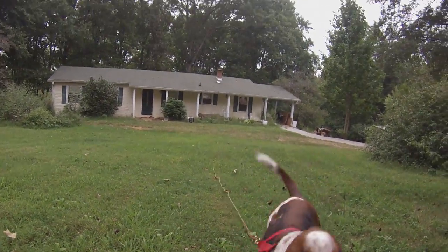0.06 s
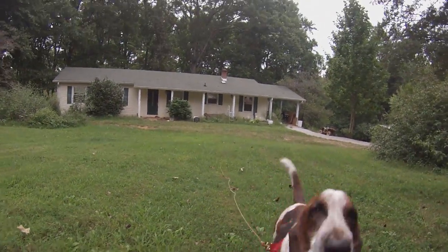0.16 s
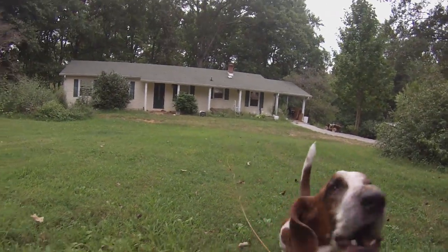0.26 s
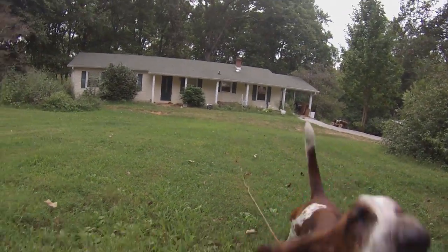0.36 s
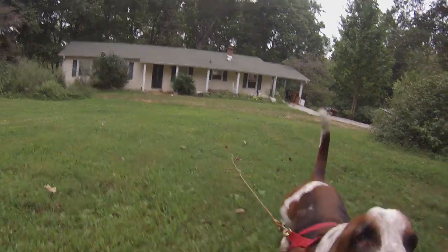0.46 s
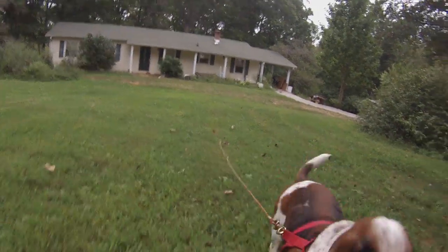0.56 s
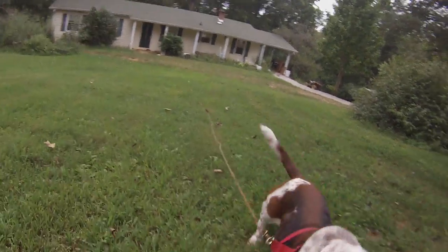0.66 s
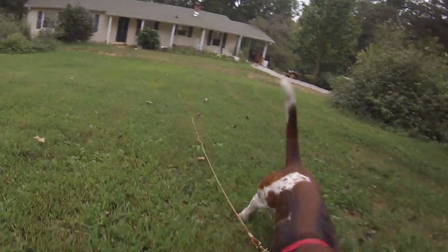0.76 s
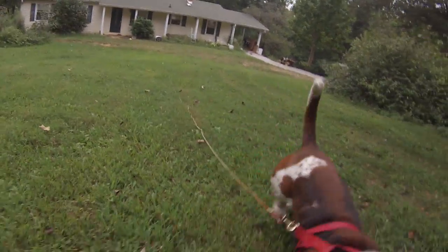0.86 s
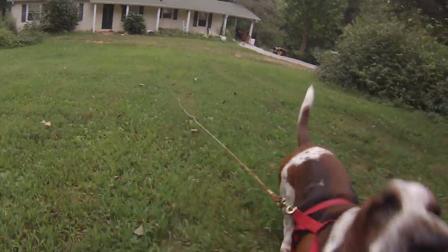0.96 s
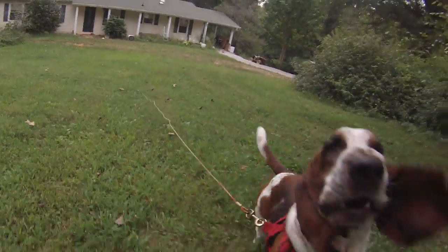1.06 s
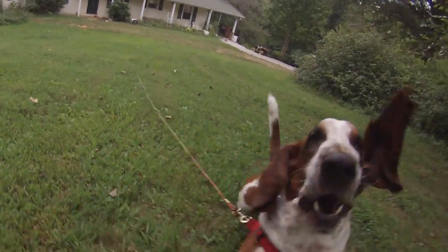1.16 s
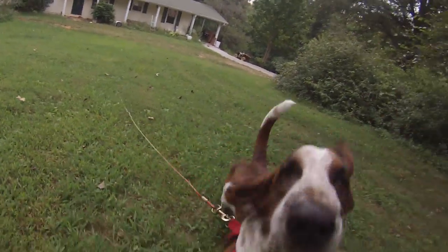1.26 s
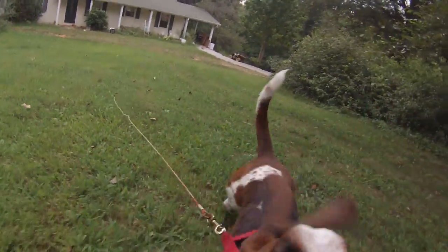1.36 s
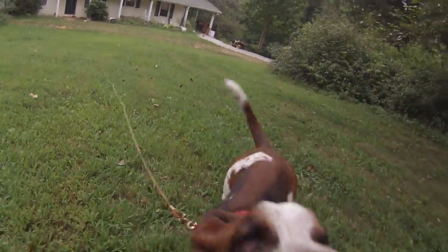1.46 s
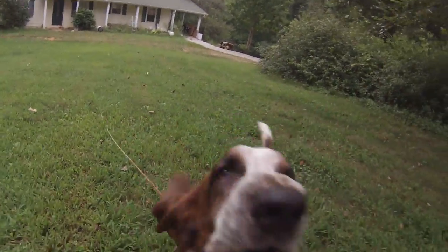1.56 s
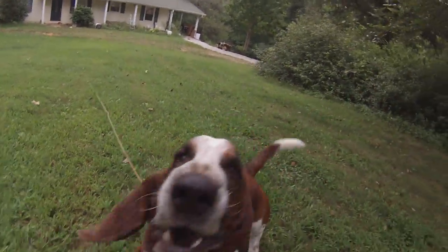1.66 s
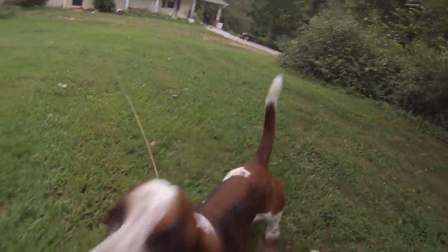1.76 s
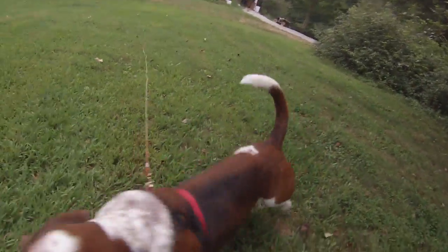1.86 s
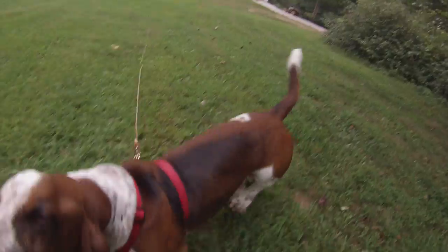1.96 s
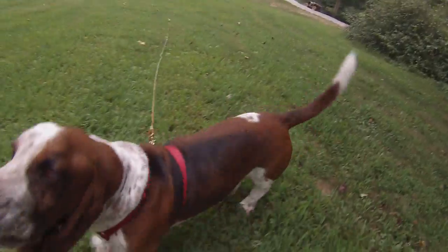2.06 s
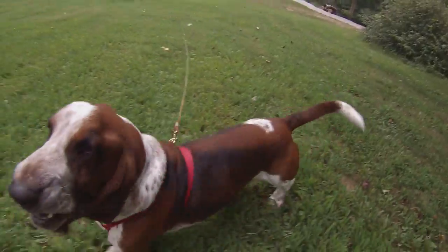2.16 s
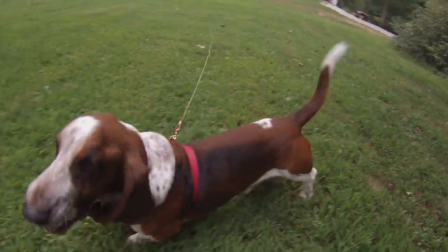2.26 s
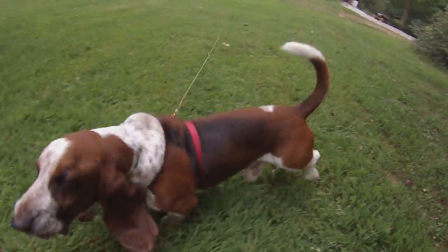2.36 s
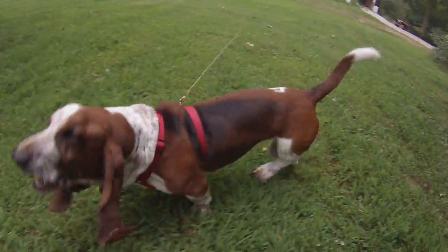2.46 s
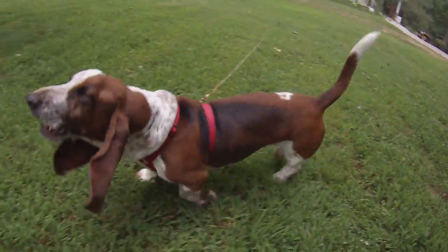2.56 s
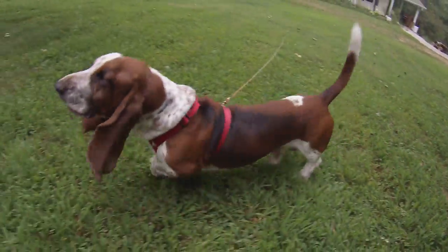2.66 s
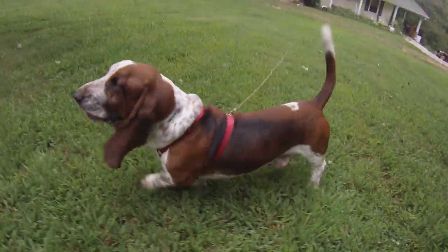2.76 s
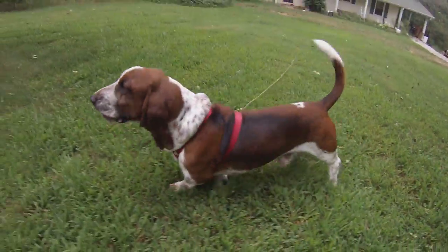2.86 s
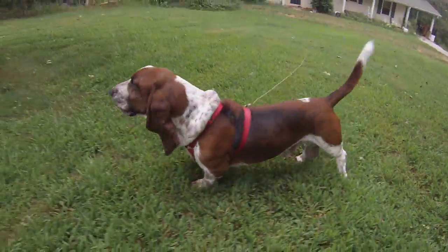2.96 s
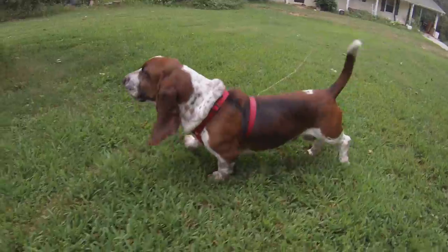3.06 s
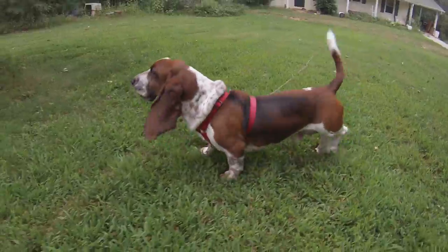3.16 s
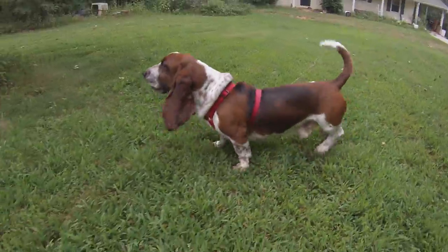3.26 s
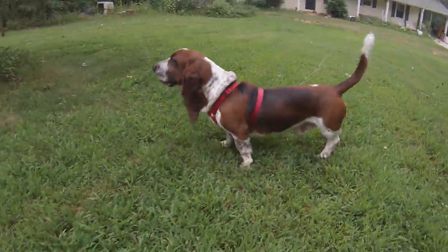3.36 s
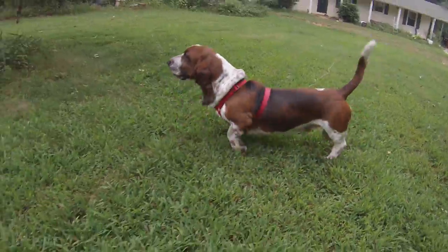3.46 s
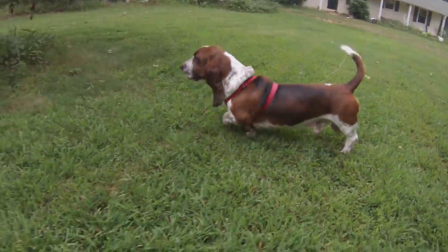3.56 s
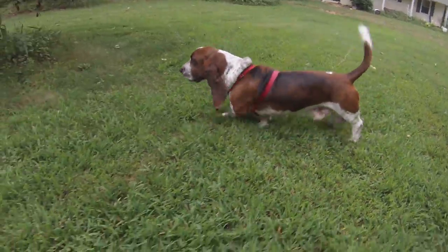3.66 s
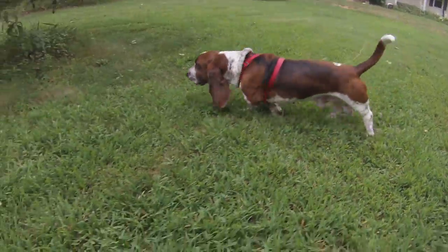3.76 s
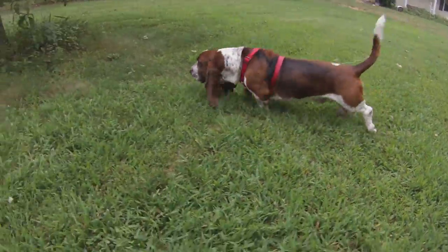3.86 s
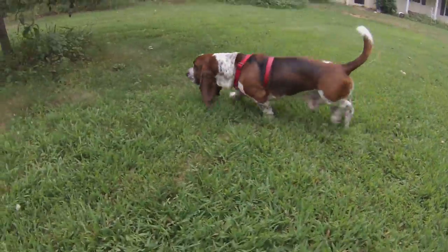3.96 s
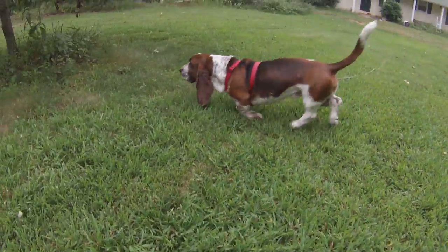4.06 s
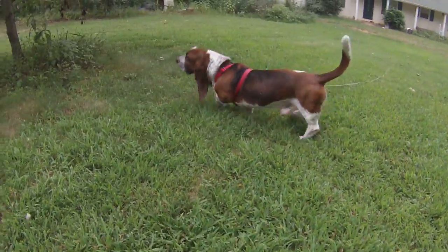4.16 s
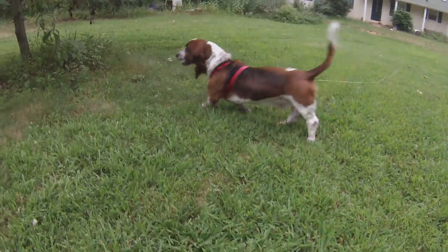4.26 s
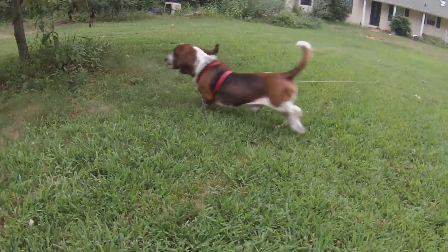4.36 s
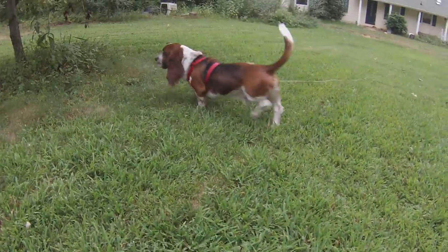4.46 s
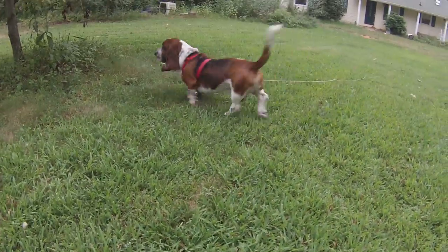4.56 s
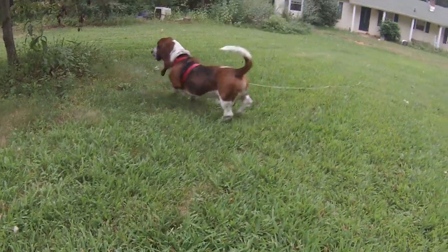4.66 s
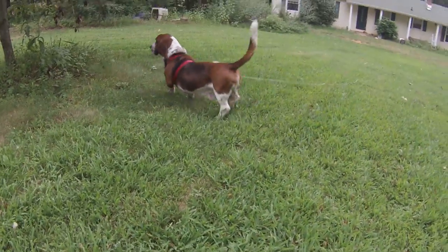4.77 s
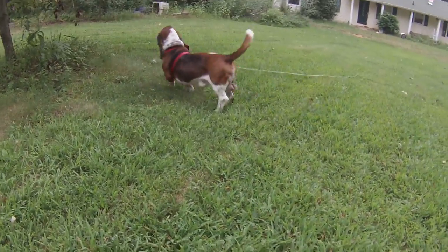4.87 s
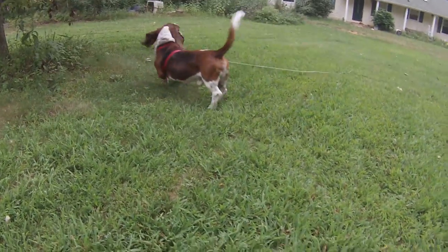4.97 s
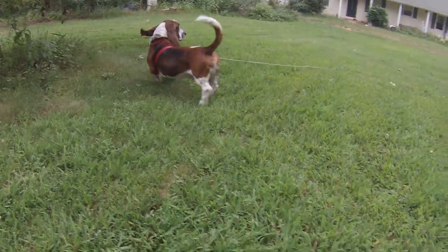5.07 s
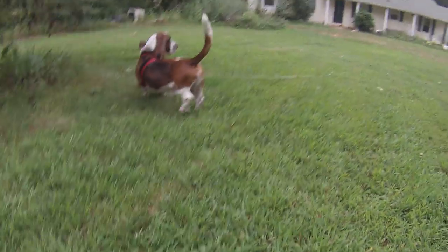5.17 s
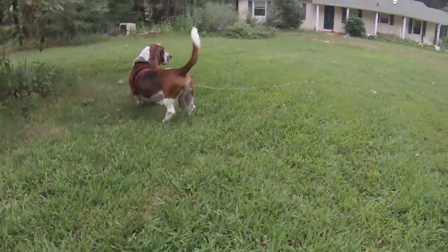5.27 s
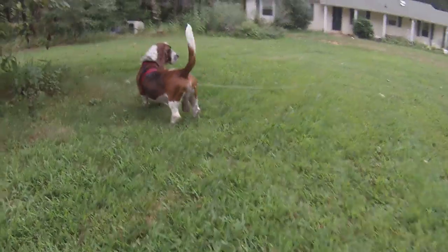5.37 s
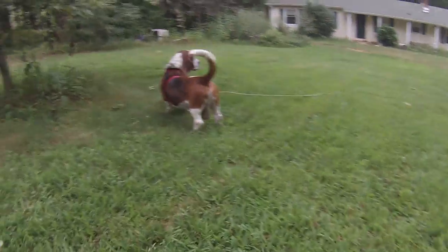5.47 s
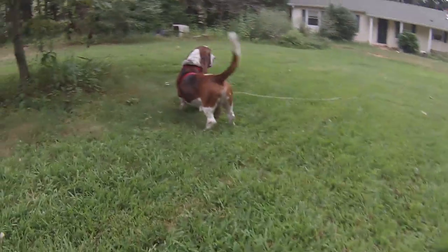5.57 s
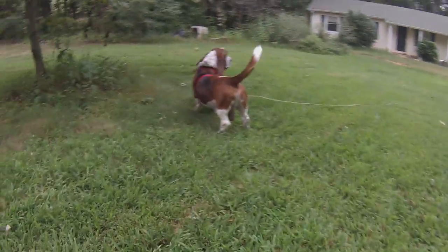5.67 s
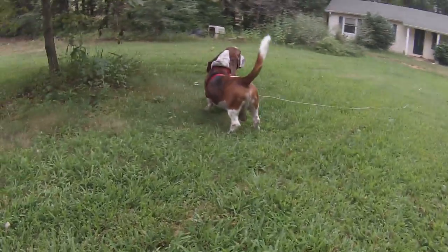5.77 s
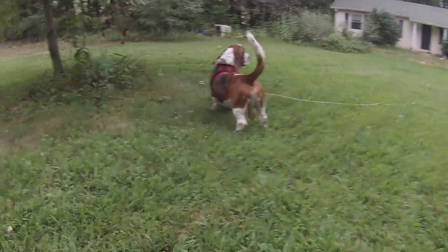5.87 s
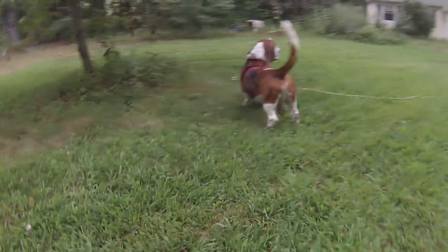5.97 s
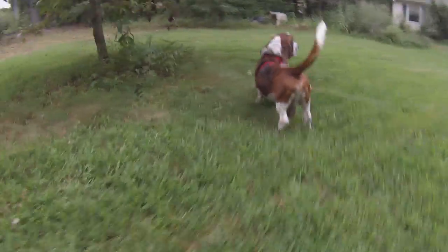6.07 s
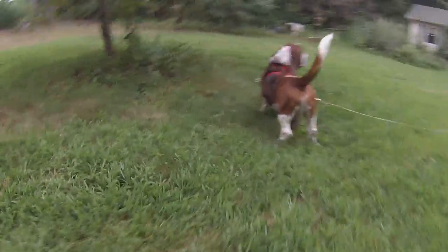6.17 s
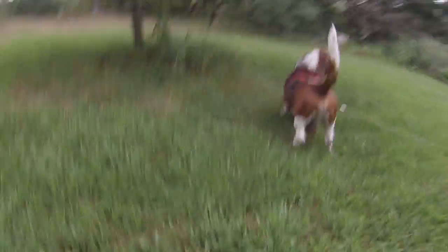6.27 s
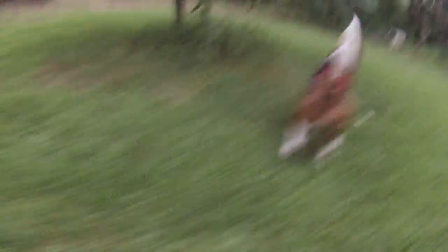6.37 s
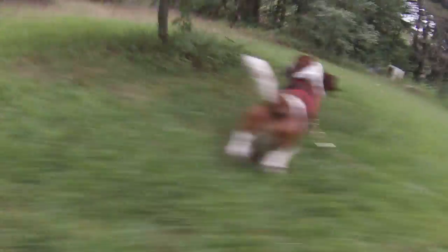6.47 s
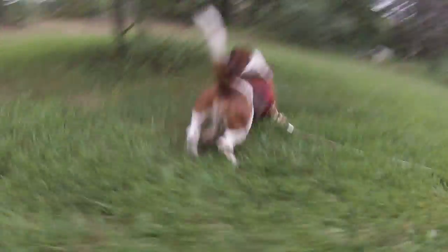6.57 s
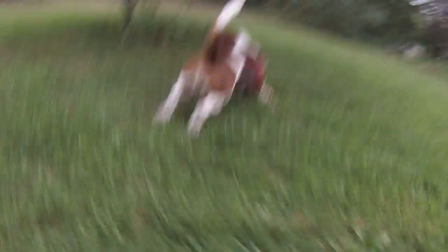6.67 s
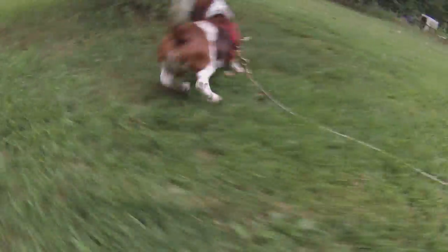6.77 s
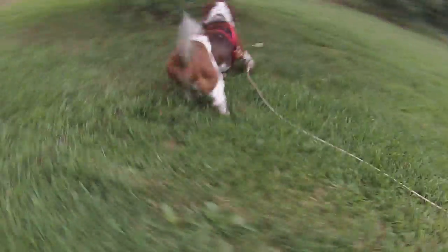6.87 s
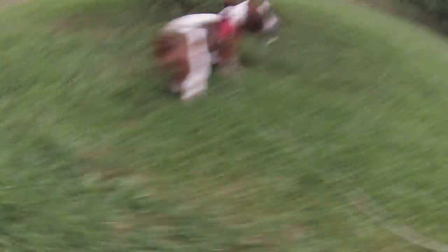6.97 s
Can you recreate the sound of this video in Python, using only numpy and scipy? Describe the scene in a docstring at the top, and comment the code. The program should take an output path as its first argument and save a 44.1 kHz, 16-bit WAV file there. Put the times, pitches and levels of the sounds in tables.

```python
"""On a lawn, a hound barks five times close to a small hand-held camera; a house front answers faintly.
Each bark is a train of pulses from the vocal folds that rings in the dog's head and turns hoarse midway.
The camera case is knocked, creaks and rubs in the hand, and moving air buffets the microphone,
mostly near the end. Behind it all are a distant hush and a faint, fluttering high hiss."""
import sys
import numpy as np
from scipy import signal
from scipy.fft import rfft, irfft, next_fast_len
from scipy.io import wavfile
from scipy.ndimage import uniform_filter1d, map_coordinates

SR = 44100
rng = np.random.default_rng(int(sys.argv[2]) if len(sys.argv) > 2 else 0)


def dump_mix(stems):
    """Bounce the given channels to the path in sys.argv[1] as a 16-bit WAV at rate SR."""
    frames = np.atleast_2d(stems).T  # one column per channel
    limited = np.clip(frames, -1, 1)  # hard clip at full scale
    pcm = np.round(limited * 32767).astype(np.int16)
    wavfile.write(sys.argv[1], SR, pcm)


N = 310023

# The course of each bark, one list per bark: time_s, pitch_hz, effort_db
BARKS = [
    [(.25, 219.2, -76), (.276, 245.1, -29.5), (.302, 327.3, -18.5), (.33, 365.2, -20.5), (.38, 379.7, -17),
     (.43, 379.6, -18), (.447, 303, -28.5), (.465, 228.8, -37.5), (.49, 179.2, -58)],
    [(.8, 185.3, -53.5), (.836, 283, -29.5), (.86, 364.7, -24.5), (.885, 412.7, -19), (.92, 398, -13),
     (.99, 392.7, -12.5), (1.01, 314.5, -21), (1.032, 230.7, -32.5), (1.06, 182.8, -64)],
    [(1.365, 220.1, -70.5), (1.387, 259.5, -22), (1.417, 329.1, -12), (1.445, 379.6, -11),
     (1.47, 379, -10.5), (1.505, 405.2, -13), (1.538, 375, -14.5), (1.572, 242, -32), (1.605, 191.4, -62.5)],
    [(1.885, 190.4, -57), (1.915, 251.8, -26.5), (1.943, 324.2, -21), (1.97, 388.2, -16.5),
     (2.0, 396.1, -12.5), (2.045, 392.8, -14), (2.07, 364.5, -20), (2.1, 260.8, -33.5),
     (2.125, 195.5, -61.5)],
    [(2.45, 205, -64), (2.484, 254, -40.5), (2.512, 329.7, -26.5), (2.535, 387, -24.5), (2.58, 396, -18),
     (2.633, 393.7, -23), (2.663, 281.2, -37), (2.69, 196, -62)],
]
# Where each bark turns hoarse: time_s, hoarseness_before, hoarseness_after (both 0 to 1)
VOICE_BREAKS = [(.381, .04, .65), (.886, .12, .72), (1.446, .1, .48), (1.958, .1, .58), (2.523, .15, .7)]
# Resonances (the pitches a space likes to ring at) in the dog's head: centre_hz, width_hz, gain_db
THROAT = [(416, 136, 6.5), (566, 320, 4)]
MOUTH = [(904, 420, 2), (1158, 320, 5), (1292.5, 170, 4.5)]
TEETH = [(2426, 200, 1), (2930, 1200, -7), (3264, 170, -1.4)]
BREATH = [(4610, 550, -1), (5600, 310, 2), (6170, 300, -0.5), (6840, 500, -7), (7600, 480, -5),
          (8970, 940, -8.5), (11050, 1200, -7.5), (13200, 1200, -11)]
# A fixed ring near 1.5 kHz that colours every bark: centre_hz, width_hz, gain_db
MID_RING = [(1527.5, 180, 4), (1984, 260, -6)]
# Each bark's own colour: mouth_db, mid_ring_db, low_teeth_db, high_teeth_db, breath_db
BARK_COLOURS = [(1, 0.5, 0.5, -7, 1), (-1.9, 4, -0.3, -4, -1), (0.99, -3, 0.8, -1.85, 1),
                (-1.4, 1.5, -5, -0.5, -4.5), (0.73, 0.5, 2.5, 6, 2)]
# Levels as the jaw follows the pitch: pitch_hz, throat_db, mouth_db, mid_ring_db, teeth_db, breath_db
JAW_OPENING = [(201.4, -3.5, -6, -9, -18, -18.5), (250, -0.5, -14, -11, -27, -27),
               (325, -13.5, -4, -2, -24, -19.5), (370, -9, -6, -7, -19.5, -22),
               (393, -2.5, -1.5, -4.5, -19.5, -27)]
JAW_CLOSING = [(180, -5.5, -12.5, -5, -0.32, -8.5), (240, 1.5, -12.5, -17, -9, -13),
               (370, -5.5, -6, -7.5, -27, -22), (405, -4.5, -5.5, -3, -23, -25.5)]
# Knocks on the case: start_s, snap_db, crack_db, treble_db_per_octave, latch_db
KNOCKS = [(.584, -66, -39, 4, -60), (3.6908, -8, -13.5, 1, -38), (5.31, -43.5, -46, -16, -69.5),
          (6.012, -48.5, -40.5, -1, -63), (6.111, -26.5, -25, -15.5, -54), (6.1968, -21, -12.5, 0.5, -48),
          (6.3023, -42, -36, -1.5, -59), (6.3094, -34, -30, -0.5, -56), (6.3321, -30, -35, 0, -61),
          (6.374, -33, -23, -8, -50), (6.4579, -4.5, -33.5, -5, -33), (6.4702, -4, -21, -3.5, -51),
          (6.4788, -4, -36, -9, -22), (6.587, -32, -48, 4, -70), (6.703, -42, -28, 1, -48),
          (6.753, -41, -24, 2, -29), (6.529, -32, -38, -10, -58), (6.801, -27, -38.5, -10, -50),
          (6.894, -40, -40, 3.24, -40), (6.91, -26.5, -27, 1.1, -31), (6.939, -42, -26, 1.2, -22.5),
          (6.9818, -17.5, -22, -3, -45)]
# Resonances of the camera case: centre_hz, width_hz, gain_db
CASE = [(654, 270, -3), (1274, 140, 4.5), (2100, 510, 0), (2839, 330, 1.5), (3270, 170, -1.5),
        (4260, 530, -6), (5600, 1000, -13.5), (7500, 2300, -14), (11500, 12000, -17.5)]
# The latch's ring: pitch_hz, fade_s, after_ring_share, after_ring_fade_s (a fade is a drop of 60 dB)
LATCH_RING = (2770, .025, .12, .12)
# The hand slips on the case: start_s, length_s, low_creak_db, high_creak_db, squeak_hz
RUBS = [(1.139, .098, -61.5, -59.5, 3130), (3.692, 0.049, -60, -42.5, 2100), (3.874, 0.1, -64, -57.5, 3190),
        (6.11, 0.049, -48.5, -45, 3100), (6.18, 0.05586, -38.5, -41, 2110),
        (6.301, 0.017, -51, -51.5, 2800), (6.376, 0.05505, -29, -38.5, 2700),
        (6.456, .03, -27.5, -65, 2700), (6.475, 0.049, -28, -31, 2450), (6.501, .06, -54, -51, 1900),
        (6.574, 0.03, -48.5, -66, 2200), (6.699, 0.031, -38, -33.5, 2095),
        (6.731, 0.052, -45.5, -31.5, 2820), (6.792, 0.023, -60, -61, 2400),
        (6.922, 0.034, -43.5, -68, 2800), (6.989, 0.02, -43, -35.5, 2910)]
# Moving air, strong once the camera swings: time_s, level_db
BUFFET_LEVELS = [(0.0, -59), (0.45, -53.5), (1.66, -55), (2.64, -56.5), (3.5, -63.5), (3.8, -54.5),
                 (4.15, -65), (5, -60.5), (5.15, -54), (5.87, -65), (5.97, -50.5), (6.21, -38), (6.6, -38),
                 (6.81, -36), (6.89, -51), (7.03, -36.5)]
# The tone of that air, from low to high: frequency_hz, level_db
BUFFET_TONE = [(10, -3.5), (25, -1.5), (50, -10.5), (100, -24), (200, -26), (400, -45), (800, -80)]
# How long the echo from the house lasts: frequency_hz, fade_s
ECHO_FADES = [(300, 0.12), (1500, 0.27), (5000, 0.82)]
# The tone of the distant hush: frequency_hz, level_db
HUSH_TONE = [(35, -36), (60, -1.5), (408, -11), (448, -12.5), (527, -14.5), (621, -13.5), (682, -15.5),
             (991, -16.5), (1250, -18), (2250, -23), (5460, -29), (6900, -25.5), (8710, -32), (14600, -32),
             (16000, -43.5)]
# A faint, fluttering band of hiss: time_s, level_db
FLUTTER_LEVELS = [(0.0, -70), (1.1, -66.5), (2.4, -66), (3.4, -80.5), (3.8, -67.5), (4.1, -80), (5.3, -82),
                  (6.3, -66.5), (7.03, -65)]

DOG_SAMPLES = 3 * SR  # the barking is over by then
FLAP_RATIO = 1.36  # a second, looser fold vibrates at this multiple of the pitch
CRACK_FADE_S, DOUBLINGS_PER_DB = .016, .2  # brighter cracks last longer
THUMP_DB, SHAKE_DB, SQUEAK_DB = -11.5, -15, -.5  # the first two added to crack_db, the last to high_db
GRIP_DB = (-22.5, -21.5)  # low and high rustle of the grip, added to the buffet level
ECHO_DB, HUSH_DB, TOP_HZ = -29.5, -59, 15500


def dog():
    """Pulses from the vocal folds ring in the throat, mouth and teeth; a mid ring and breath join in."""
    pitch_hz, effort_db = [curve[:DOG_SAMPLES] for curve in curves(np.vstack(BARKS))]
    hoarse, levels_db = bark_shape(pitch_hz)
    pulses, overtones, hiss, chest = vocal_folds(pitch_hz, hoarse)
    throat, mouth, mid_ring, low_teeth, high_teeth, breath = amp(levels_db)
    throat_ring = filtered(pulses, lambda hz: twice(THROAT)(hz) * above(hz, 220))
    voice = throat * (steady(throat_ring, .023) + chest)
    voice += mouth * steady(filtered(pulses, twice(MOUTH)), .03)
    voice += mid_ring * steady(filtered(pulses, twice(MID_RING)), .02)
    for gain, hiss_share, table, edge_hz in [(low_teeth, .02 + .3 * hoarse, TEETH[:1], 2100),
                                             (high_teeth, .1 + .3 * hoarse, TEETH[1:], 2500),
                                             (breath, .3, BREATH, 3500)]:
        voice += gain * steady(tongue_and_lips(overtones + hiss_share * hiss, table, edge_hz), .03)
    return np.pad(voice * amp(effort_db), (0, N - DOG_SAMPLES)) * sounding(BARKS, fade_s=.01)


def vocal_folds(pitch_hz, hoarse):
    """The folds open and shut at the pitch; when hoarse, they slip in time and loose tissue rattles."""
    drift = lambda per_s: wobble(per_s, count=DOG_SAMPLES)
    phase = 2 * np.pi * np.cumsum(pitch_hz * (1 + .022 * hoarse * drift(45))) / SR
    phase += .4 * hoarse * drift(330)
    tones = [np.cos(k * phase) / k for k in range(1, 25)]
    rattle = unit(drift(700) * (1 + np.cos(phase)))
    flap_hz = FLAP_RATIO * pitch_hz * (1 + .05 * drift(60))
    flap = np.cos(2 * np.pi * np.cumsum(flap_hz) / SR) * amp(4.5 * drift(40))
    # the flap adds tones between the overtones; at times every second pulse is weaker
    strength = 1 + hoarse * (.45 * drift(250) + .55 * flap + .18 * drift(25) * np.cos(phase / 2))
    pulses = sum(tones[:8]) * strength + hoarse * (.7 * rattle + .3 * flap)
    overtones = sum(tones[4:]) * strength
    hiss = rng.standard_normal(DOG_SAMPLES) * (1 + .5 * np.cos(phase)) * amp(2.9 * drift(150))
    chest = amp(-9) * tones[0] * np.clip(2.6 - pitch_hz / 160, .15, 1)  # hums along at low pitch
    return pulses, overtones, hiss, chest


def bark_shape(pitch_hz):
    """Hoarseness and resonance levels: each bark opens clean, then breaks as the jaw starts to close."""
    hoarse, levels_db = np.zeros(DOG_SAMPLES), np.zeros((6, DOG_SAMPLES))
    for bark, (break_s, clean, rough), colour_db in zip(BARKS, VOICE_BREAKS, BARK_COLOURS):
        start, turn = round(bark[0][0] * SR), round(break_s * SR)
        hoarse[start:], hoarse[turn:] = clean, rough
        levels_db[:, start:] = jaw(pitch_hz[start:], JAW_OPENING)
        levels_db[:, turn:] = jaw(pitch_hz[turn:], JAW_CLOSING)
        levels_db[1:, start:] += np.array(colour_db)[:, None]
    tension = np.clip((pitch_hz - 150) / 200, .3, 1)  # slack folds settle as the pitch sinks
    return uniform_filter1d(hoarse, SR // 200) * tension, uniform_filter1d(levels_db, SR // 100, axis=1)


def jaw(pitch_hz, rows):
    """The level of each group of resonances at this pitch; low and high teeth share one."""
    row_hz, *columns = np.transpose(rows)
    throat, mouth, mid_ring, teeth, breath = [np.interp(pitch_hz, row_hz, db) for db in columns]
    return np.array([throat, mouth, mid_ring, teeth, teeth, breath])


def tongue_and_lips(sound, table, edge_hz, sway=.03):
    """Each resonance slides, swells and fades on its own as the tongue and lips move."""
    out = 0
    for centre_hz, width_hz, gain_db in table:
        blend = np.clip(.5 + .4 * wobble(14, count=len(sound)), 0, 1)
        rings = [twice([(centre_hz * (1 + shift), width_hz, gain_db)]) for shift in (-sway, sway)]
        low, high = [filtered(sound, lambda hz: ring(hz) * above(hz, edge_hz)) for ring in rings]
        swell = amp(4 * wobble(22, count=len(sound)))
        out += swell * (np.sqrt(1 - blend) * low + np.sqrt(blend) * high)
    return out


def knocks():
    """Each knock snaps the wall, sends a crack through the case, rings the latch and jolts the microphone."""
    out, t = np.zeros(N + SR), np.arange(SR // 10) / SR
    fade = lambda fade_s: amp(-60 * t / fade_s)
    sine = lambda hz: np.sin(2 * np.pi * hz * t)
    snap = -np.sin(2 * np.pi * np.clip(800 * t, 0, 1)) * (.33 + 300 * t)  # one swing in and out
    snap += .033 * filtered(snap, resonances(CASE))
    latch_hz, ring_s, after_share, after_s = LATCH_RING
    latch = sine(latch_hz) * (fade(ring_s) + after_share * fade(after_s)) * (1 - np.exp(-t / .00073))
    jolt = amp(THUMP_DB) * sine(120) * fade(.037) + amp(SHAKE_DB) * sine(45) * fade(.17)
    for start_s, snap_db, crack_db, treble_db, latch_db in KNOCKS:
        burst = rng.standard_normal(len(t)) * fade(CRACK_FADE_S * 2 ** (DOUBLINGS_PER_DB * treble_db))
        treble = lambda hz: amp(treble_db * np.log2(1 + hz / 1500)) / (1 + (hz / 11000) ** 4)
        crack = filtered(burst, lambda hz: resonances(CASE)(hz) * treble(hz))
        crack /= np.abs(crack).max()
        knock = amp(snap_db) * snap + amp(crack_db) * (crack + jolt) + amp(latch_db) * latch
        out[round(start_s * SR):][:len(t)] += knock
    return out[:N]


def rubbing():
    """The hand rustles on the case all along; each slip adds a low creak, a high creak and a squeak."""
    low, high = [amp(curves(BUFFET_LEVELS)[0] + db + 4 * wobble(25)) for db in GRIP_DB]
    squeak = np.zeros(N)
    for start_s, length_s, low_db, high_db, squeak_hz in RUBS:
        span = slice(round(start_s * SR), round((start_s + length_s) * SR))
        t = np.arange(len(low[span])) / SR
        stroke = np.sin(np.pi * np.linspace(0, 1, len(t)) ** .7) ** 1.87  # grips fast, lets go slowly
        low[span] += amp(low_db) * stroke
        high[span] += amp(high_db) * stroke
        squeak[span] += amp(high_db + SQUEAK_DB) * stroke * np.sin(2 * np.pi * squeak_hz * t)
    return squeak * wobble(350) + low * creak(CASE[:1], 2200, 2) + high * creak(CASE[1:], 3500, 1.6)


def creak(table, dull_above_hz, steepness):
    """Skin slips in many tiny, uneven steps that make the case ring."""
    slips = rng.standard_normal(N) * amp(3.5 * wobble(300) + 1.5 * wobble(50))
    tone = lambda hz: resonances(table)(hz) / (1 + 1j * hz / dull_above_hz) ** steepness
    return unit(filtered(slips, tone))


def buffeting():
    """Lumps of moving air hit the microphone and rumble."""
    return amp(curves(BUFFET_LEVELS)[0] + wobble(36) + 3 * wobble(7)) * noise(BUFFET_TONE)


def house_echo(sound, delay_s=.07):
    """The house front and trees send back a late, thin answer."""
    bands_hz, t, bands = signal.stft(rng.standard_normal(SR // 2), SR, nperseg=256)
    fades = amp(-60 * t / along(ECHO_FADES, bands_hz)[:, None])
    tail = signal.istft(bands * fades, SR, nperseg=256)[1]
    delayed = np.pad(sound, (int(delay_s * SR), 0))
    echo = signal.fftconvolve(delayed, tail / np.linalg.norm(tail))[:N]
    echo *= amp(3 * wobble(7.3))  # leaves scatter it unevenly
    return filtered(echo, lambda hz: hz ** 2 / (hz ** 2 + 700 ** 2))


def distant_hush():
    """Soft, far noise whose level wavers a little."""
    return amp(HUSH_DB + .8 * wobble(2.7) + 1.1 * wobble(46)) * noise(HUSH_TONE)


def fluttering_hiss():
    """A faint, fluttering band of hiss near 3 kHz, stronger around the barks and the handling."""
    band = unit(filtered(rng.standard_normal(N), twice([(3040, 1100, 0)])))
    return band * amp(curves(FLUTTER_LEVELS)[0] + 2.5 * wobble(18))


def amp(db):
    """Turn decibels into a number to multiply by."""
    return 10 ** (np.asarray(db) / 20)


def unit(sound):
    """Scale a sound to an average (rms) level of 1."""
    return sound / np.sqrt(np.mean(sound ** 2) + 1e-20)


def steady(sound, span_s):
    """Even out level changes slower than span_s."""
    return sound / np.sqrt(np.abs(uniform_filter1d(sound ** 2, int(span_s * SR))) + 1e-12)


def along(points, hz):
    """Read between (frequency_hz, value) points, with octaves evenly spaced."""
    point_hz, values = np.transpose(points)
    return np.interp(np.log(hz + 1), np.log(point_hz + 1), values)


def curves(rows):
    """One value per sample for each column after the time."""
    times_s, *columns = np.transpose(rows)
    return [np.interp(np.arange(N) / SR, times_s, column) for column in columns]


def sounding(tables, fade_s):
    """1 while one of the tables lasts, 0 between them."""
    t = np.arange(N) / SR
    inside = np.any([(t >= rows[0][0]) & (t <= rows[-1][0]) for rows in tables], axis=0)
    return uniform_filter1d(inside * 1., int(fade_s * SR))


def wobble(per_s, count=N):
    """A smooth curve through per_s random points a second."""
    points = rng.standard_normal(int(count * per_s / SR) + 4)
    return map_coordinates(points, [np.arange(count) * per_s / SR])


def noise(tone):
    """Noise shaped by (frequency_hz, level_db) points."""
    return unit(filtered(rng.standard_normal(N), lambda hz: amp(along(tone, hz))))


def filtered(sound, response):
    """Multiply each frequency in a sound by response(hz)."""
    size = next_fast_len(len(sound) + SR // 4)
    return irfft(rfft(sound, size) * response(np.fft.rfftfreq(size, 1 / SR)), size)[:len(sound)]


def resonances(table):
    """A filter that rings at each (centre_hz, width_hz, gain_db) row."""
    return lambda hz: sum((-1) ** k * amp(db) * 1j * hz * width / (centre**2 - hz**2 + 1j * hz * width)
                          for k, (centre, width, db) in enumerate(table))


def twice(table):
    """Resonances passed twice, for deeper dips between them."""
    return lambda hz: resonances(table)(hz) ** 2


def above(hz, edge_hz):
    """A filter that steeply cuts what lies below edge_hz."""
    return hz ** 4 / (hz ** 4 + edge_hz ** 4)


def scene():
    """The dog, its echo, the handled camera and the open air, in one channel."""
    barks = dog()
    echo = amp(ECHO_DB) * house_echo(barks)
    return (barks + echo + knocks() + rubbing() + distant_hush() + fluttering_hiss() + buffeting())[None]


def record(dry):
    """The camera keeps nothing above TOP_HZ."""
    return filtered(dry[0], lambda hz: hz < TOP_HZ)[None]


dry = scene()
out = record(dry)
dump_mix(out)
```